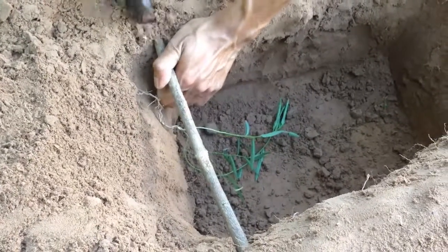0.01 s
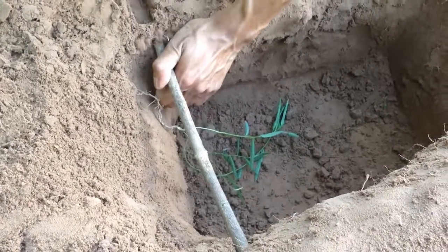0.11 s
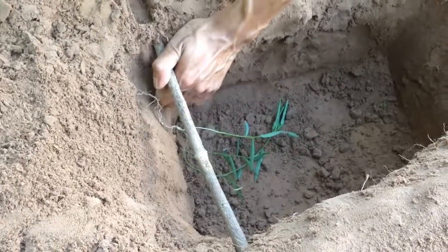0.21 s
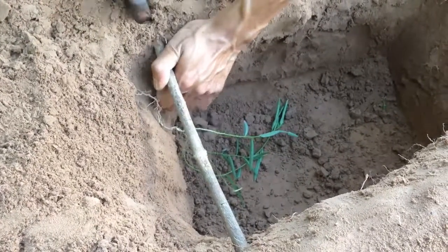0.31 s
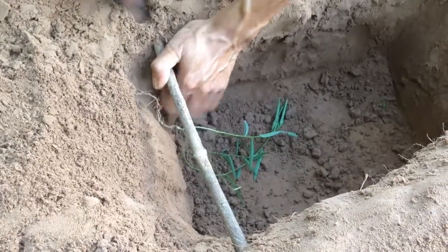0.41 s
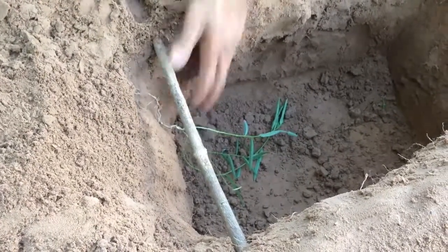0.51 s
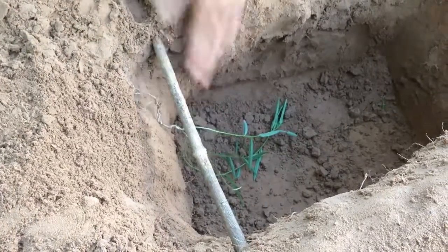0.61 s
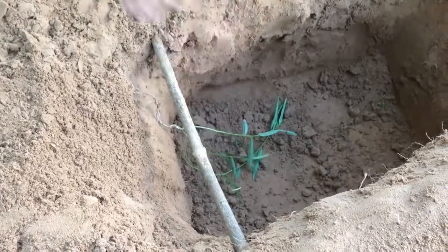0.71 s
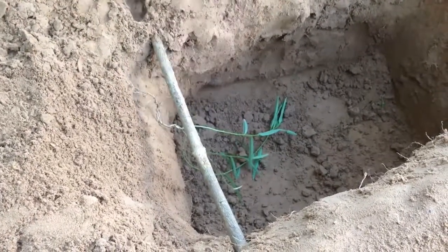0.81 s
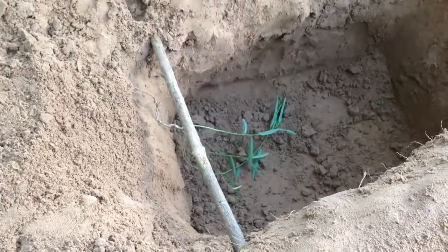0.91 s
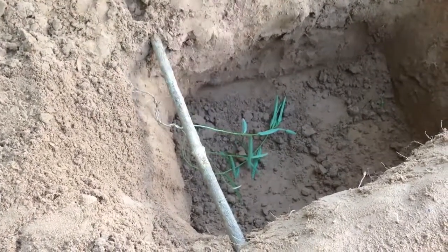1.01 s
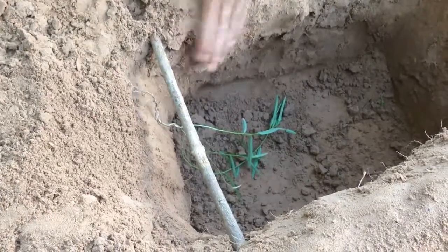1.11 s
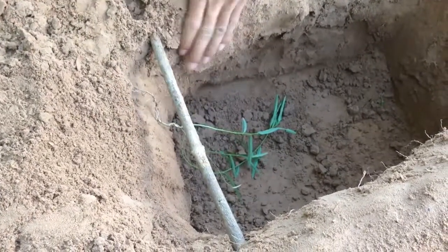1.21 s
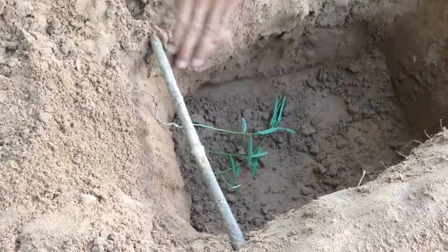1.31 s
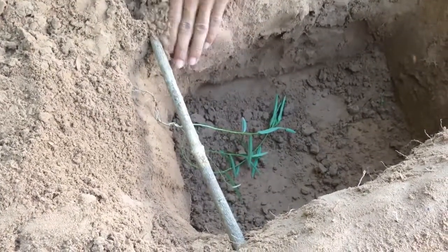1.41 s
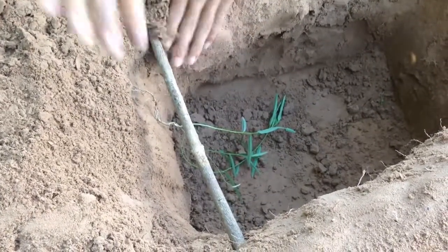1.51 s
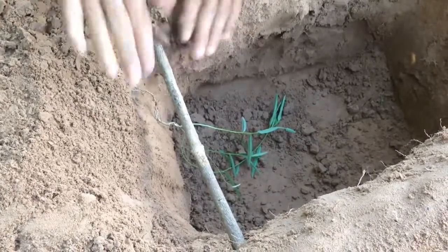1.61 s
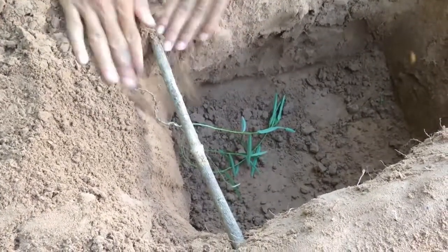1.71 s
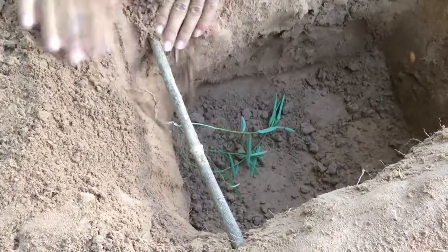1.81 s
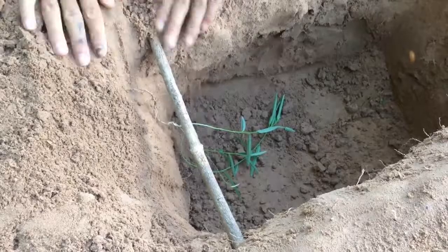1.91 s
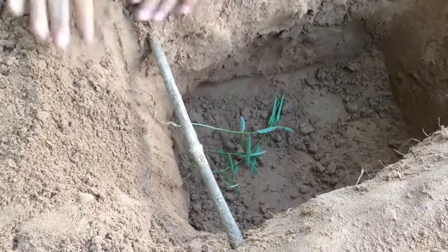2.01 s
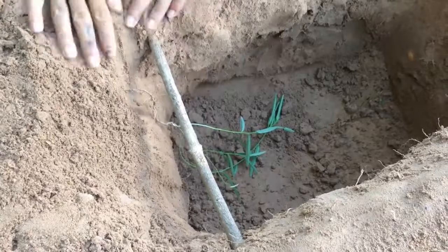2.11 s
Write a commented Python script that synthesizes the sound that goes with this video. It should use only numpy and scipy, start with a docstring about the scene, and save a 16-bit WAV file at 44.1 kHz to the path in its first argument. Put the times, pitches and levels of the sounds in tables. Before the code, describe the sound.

Pipe knocked into hard earth twice, thudding and clacking, followed by a duller palm pat and faint brushing

```python
"""At the edge of an earth pit, a thin pipe is knocked into hard-packed soil: two hard blows, then softer pats by hand.
Each blow is a hollow thud of the ground (two low swelling tones) under a short clack of the pipe
(a click through resonances damped by the soil). The palm pops, and crust cracks and drops a little grit (noise bursts).
Hands brush the dry earth (swept, grainy noise) over a faint, nearly steady hiss (coloured noise).
The pit walls scatter the clacks and pops, and banks of earth further off send back dull echoes."""
import sys
import numpy as np
from scipy import signal
from scipy.fft import rfft, irfft, next_fast_len
from scipy.io import wavfile

SR = 44100
rng = np.random.default_rng(int(sys.argv[2]) if len(sys.argv) > 2 else 0)


def store_pcm(level_fs):
    """Save levels as 16-bit WAV."""
    pcm = np.round(np.clip(level_fs, -1, 1) * 32767).astype(np.int16)
    wavfile.write(sys.argv[1], SR, np.atleast_2d(pcm).T)


N = 97020  # length in samples, 2.2 s

# Thuds of the ground, two low resonances each: (time [s], upper pitch [Hz], upper level [dB],
# upper time to peak [s], lower pitch [Hz], lower level [dB], lower time to peak [s])
GROUND_THUDS = [(.214, 226.3, -1.5, 0.0052, 160.7, -10.5, .0078),
                (.562, 234.7, -1.94, .0049, 165.8, -8.8, .0073),
                (1.266, 260, -55.5, 0.0048, 65.3, -55.5, 0.0056),
                (1.4278, 214, -29, 0.0062, 162.1, -36.5, 0.0077),
                (1.936, 205, -18, .0066, 120, -19.5, 0.0061), (2.043, 290, -47, .0025, 166.3, -44, 0.0031),
                (2.162, 386.4, -39.5, 0.0025, 159.3, -29, 0.0059)]
# The push of air is set relative to the lower tone
PUSH_DB, PUSH_PEAK_S = -29, 0.003
# Colour of the dull answer of the surroundings: (frequency [Hz], level [dB])
ANSWER_COLOUR = [(30, -19.5), (90, -4.5), (170, 1), (280, -0.5), (380, -17.5), (800, -26), (1600, -35.5),
                 (5000, -55.5)]
# The answer is set relative to the upper tone; T60 is the time to fall by 60 dB
ANSWER_DB, ANSWER_T60_S, ANSWER_RISE_S = -37.5, 0.22, 0.008

# Contacts that ring the pipe: (time [s], level [dB], dulling [dB per octave])
PIPE_CONTACTS = [(0.215, -1, 0.5), (0.5626, -5, 0.65), (1.9389, -13.5, 7), (2.1644, -35, 2.5)]
# Resonances of the pipe in soil, before dulling and scatter: (pitch [Hz], level [dB], width [Hz])
PIPE_RESONANCES = [(476, 27, 95), (691, 23.5, 64), (850, 31.5, 140), (1154.3, 15.5, 230), (1363, 21, 170),
                   (2046, 21.5, 320), (2430, 20.5, 310), (3230, 13.5, 300), (3620, 17.5, 270),
                   (3885, 11.5, 140), (4300, 5, 160), (5060, 6.5, 350), (6450, -8.5, 870),
                   (11370, -12, 4000)]
# Dulling tilts around the pivot; pitch sags by this fraction per dB of dulling; levels vary at random
PIVOT_HZ, SAG_PER_DB, SCATTER_DB = 700, 0.005, 0.8

# Slaps of the palm on earth: (time [s], level [dB], pitch [Hz], time to peak [s])
PALM_SLAPS = [(1.277, -57.5, 1200, .002), (1.4242, -46.5, 1060, 0.0017), (1.9375, -20.5, 887, 0.0022)]

# Crust giving way under a contact, or a crumb falling:
# (time [s], level [dB], time to peak [s], brightest frequency [Hz])
CRUST_CRACKS = [(0.2132, -23, 0.0014, 2170), (0.244, -51.5, .0015, 3604), (0.561, -25, 0.0018, 2503),
                (0.607, -58, .001, 3484), (1.937, -30.5, 0.0024, 3320), (2.16, -55, 0.0067, 2600)]
# Colour of breaking crust, before its bright band is added: (frequency [Hz], level [dB])
CRUST_COLOUR = [(300, -3.5), (1000, 2), (1650, -10), (2300, 2.5), (2850, -6), (3500, 0), (5200, -6.5),
                (7500, -20), (11000, -17.5), (15500, -18.5)]
BRIGHT_BAND_DB, BRIGHT_BAND_OCTAVES = 9, 0.094
GRIT_DB, GRIT_T60_S = -25, 0.14  # grit level is relative to its crack

# Strokes of a hand over dry earth: (middle time [s], half length [s], rasp level [dB], fine sand level [dB])
HAND_STROKES = [(0.798, .015, -66, -70), (0.939, 0.073, -63.5, -67.5), (1.148, 0.066, -62, -57.5),
                (1.507, 0.078, -60, -58), (1.65, 0.042, -66, -63), (2.179, 0.044, -68.5, -68)]
# Colour of the rasp: (frequency [Hz], level [dB])
RASP_COLOUR = [(100, -9.5), (260, 4.5), (600, -3.5), (1500, -10), (2400, -2), (4200, 1), (6500, -8.5),
               (12000, -24)]
# Colour of the fine sand: (frequency [Hz], level [dB])
SAND_COLOUR = [(1000, -1), (4000, -9.5), (7000, -2), (11000, 5), (15000, 0.5)]

# Short scatter between the earth walls of the pit
PIT_DB, PIT_T60_S = -14, 0.055
# Dull echoes from banks of earth further off: (delay [s], level [dB])
BANK_ECHOES = [(.033, -39), (.051, -47.5), (.085, -53.5), (.102, -52)]
ECHO_TOP_HZ = 400  # echoes get duller around and above this

# Colour of the background hiss: (frequency [Hz], level [dB])
HISS_COLOUR = [(18, -38.5), (30, -8), (102, -2), (249, -2), (369, -9.5), (606, -8), (1440, -14),
               (2300, -9.5), (2550, -10), (3980, -12.5), (4420, -9.5), (5890, -16), (10200, -10),
               (12600, -9.5), (15500, -21.5)]
# Slow course of the hiss: (time [s], level [dB])
HISS_COURSE = [(0, -61), (.4, -61.5), (.75, -61.5), (1.3, -60.5), (2.2, -59.5)]

RECORDER_TOP_HZ = 15500


def amp(db):
    """Turns decibels into a gain."""
    return 10 ** (np.asarray(db) / 20)


def since(s):
    """Seconds since a moment, zero before it."""
    return np.maximum(np.arange(N) / SR - s, 0)


def filtered(x, gain):
    """Multiplies the spectrum of x by a gain that depends on frequency."""
    size = next_fast_len(N + 8192)
    hz = np.fft.rfftfreq(size, 1 / SR)
    return irfft(rfft(x, size) * gain(hz), size)[:N]


def noise(colour):
    """Noise of rms 1, coloured by (frequency [Hz], level [dB]) points."""
    point_hz, point_db = np.transpose(colour)

    def gain(hz):
        return amp(np.interp(np.log(hz + 1), np.log(point_hz), point_db))

    x = filtered(rng.standard_normal(N), gain)
    return x / x.std()


def fade(t, t60):
    """Starts suddenly and decays exponentially, by 60 dB in t60 seconds."""
    return (t > 0) * np.exp(-np.log(1000) * t / t60)


def swell(t, peak_s):
    """Rises to 1 at peak_s, then dies away."""
    return (t / peak_s * np.exp(1 - t / peak_s)) ** 2


def ground():
    """Each blow swells two low tones in opposition and pushes some air; the open ground around answers faintly."""
    thuds, answer_level = np.zeros(N), np.zeros(N)
    for s, upper_hz, upper_db, upper_s, lower_hz, lower_db, lower_s in GROUND_THUDS:
        t = since(s)
        thuds += amp(upper_db) * np.sin(2 * np.pi * upper_hz * t) * swell(t, upper_s)
        thuds -= amp(lower_db) * np.sin(2 * np.pi * lower_hz * t) * swell(t, lower_s)
        thuds -= amp(lower_db + PUSH_DB) * swell(t, PUSH_PEAK_S)
        rise = 1 - np.exp(-t / ANSWER_RISE_S)
        answer_level += amp(upper_db + ANSWER_DB) * fade(t, ANSWER_T60_S) * rise
    return thuds + answer_level * noise(ANSWER_COLOUR)


def causal(gain):
    """The most compact impulse response that has this magnitude spectrum (minimum phase)."""
    cepstrum = irfft(np.log(np.maximum(gain, 1e-6)))
    half = len(cepstrum) // 2
    # Fold the second half onto the first, so that nothing sounds before the click
    folded = np.r_[cepstrum[0], 2 * cepstrum[1:half], np.zeros(half)]
    return irfft(np.exp(rfft(folded)))


def pipe(size=4096):
    """Each contact is a click through the pipe's damped resonances; more dulling also lowers them a little."""
    out = np.zeros(N + size)
    f = np.fft.rfftfreq(size, 1 / SR)[:, None]
    hz, mode_db, width_hz = np.transpose(PIPE_RESONANCES)
    scatter = SCATTER_DB * rng.standard_normal((len(PIPE_CONTACTS), len(PIPE_RESONANCES)))
    for (s, db, dull_db), chance_db in zip(PIPE_CONTACTS, scatter):
        tilt_db = dull_db * np.log2(hz / PIVOT_HZ)
        gains = amp(db + mode_db + chance_db - tilt_db)
        sagged_hz = hz * (1 - SAG_PER_DB * dull_db)
        bands = gains / (1 + np.abs(2 * (f - sagged_hz) / width_hz) ** 3)
        start = round(s * SR)
        out[start:start + size] += causal(bands.sum(axis=1))
    return out[:N]


def palm():
    """Air trapped under the palm gives a brief pop, a short swelling tone."""
    out = np.zeros(N)
    for s, db, hz, peak_s in PALM_SLAPS:
        t = since(s)
        out += amp(db) * np.sin(2 * np.pi * hz * t) * swell(t, peak_s)
    return out


def crust():
    """Dry crust cracks in a short noise burst with one bright band, then its grit settles."""
    out, crunch = np.zeros(N), noise(CRUST_COLOUR)
    for s, db, peak_s, bright_hz in CRUST_CRACKS:
        def bright_band(hz):
            octaves_away = np.log2((hz + 1) / bright_hz)
            return amp(BRIGHT_BAND_DB * np.exp(-0.5 * (octaves_away / BRIGHT_BAND_OCTAVES) ** 2))

        t = since(s)
        burst = filtered(crunch, bright_band)
        envelope = swell(t, peak_s) + amp(GRIT_DB) * fade(t, GRIT_T60_S)
        out += amp(db) * burst / burst.std() * envelope
    return out


def brushing(grain_db=2.5, grain_hz=300):
    """Hands sweep the earth: a rasp and a finer spill of sand, both made grainy by random level changes."""
    t = np.arange(N) / SR
    rasp_level, sand_level = np.zeros(N), np.zeros(N)
    for s, half_s, rasp_db, sand_db in HAND_STROKES:
        stroke = np.exp(-0.5 * ((t - s) / half_s) ** 2)
        rasp_level += amp(rasp_db) * stroke
        sand_level += amp(sand_db) * stroke
    wobble = np.interp(t * grain_hz, np.arange(N), rng.standard_normal(N))
    return amp(grain_db * wobble) * (rasp_level * noise(RASP_COLOUR) + sand_level * noise(SAND_COLOUR))


def pit(x):
    """Walls close by return a very short, dense scatter, modelled as fading noise."""
    tail = rng.standard_normal(N) * fade(since(0), PIT_T60_S)
    tail /= np.linalg.norm(tail)
    return amp(PIT_DB) * signal.fftconvolve(x, tail)[:N]


def echoes(x):
    """Banks of earth return mostly the bass, a few times and faintly."""
    def gain(hz):
        delays = sum(amp(db) * np.exp(-2j * np.pi * hz * s) for s, db in BANK_ECHOES)
        return delays / (1 + (hz / ECHO_TOP_HZ) ** 2)

    return filtered(x, gain)


def hiss():
    """The faint background is coloured noise whose level drifts slightly."""
    s, db = np.transpose(HISS_COURSE)
    return amp(np.interp(np.arange(N) / SR, s, db)) * noise(HISS_COLOUR)


def scene():
    """Everything as heard close above the pit."""
    clacks = pipe() + palm()
    blows = ground() + clacks + pit(clacks) + crust()
    return (blows + echoes(blows) + brushing() + hiss())[None]


def record(dry):
    """The recorder rounds off peaks near full scale and cuts steeply above its band limit."""
    rounded = dry[0] / (1 + np.abs(dry[0]) ** 12) ** (1 / 12)
    return filtered(rounded, lambda hz: 1 / (1 + (hz / RECORDER_TOP_HZ) ** 120))[None]


dry = scene()
out = record(dry)
store_pcm(out)
```